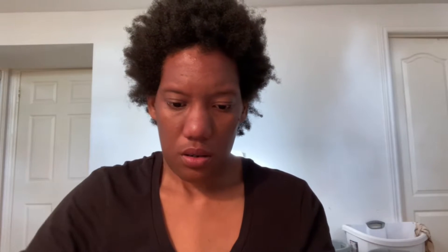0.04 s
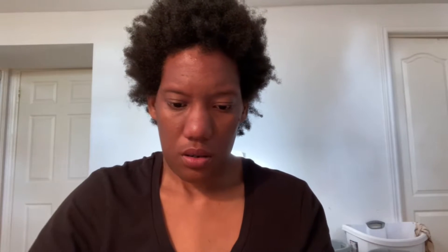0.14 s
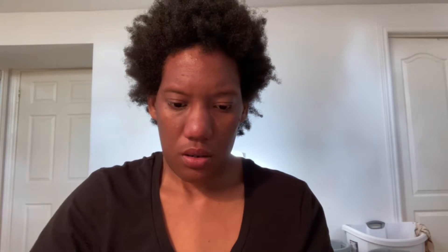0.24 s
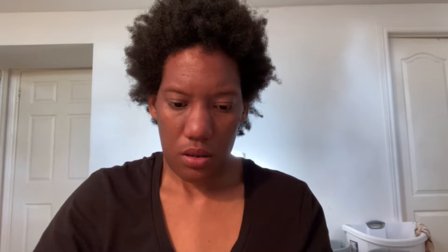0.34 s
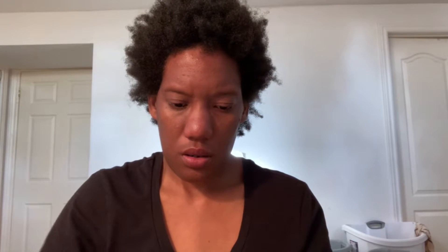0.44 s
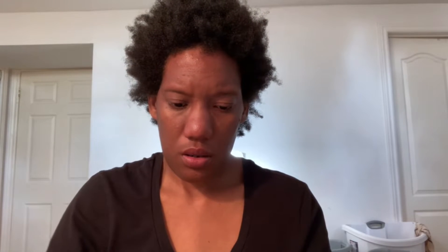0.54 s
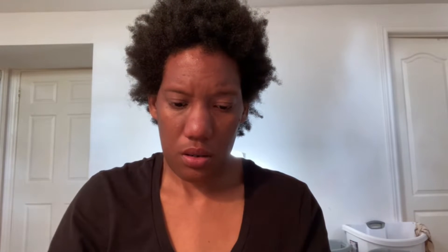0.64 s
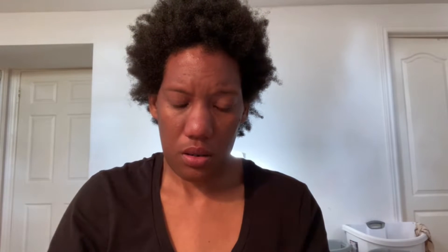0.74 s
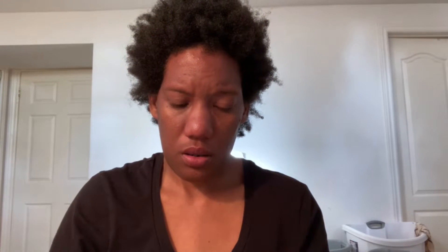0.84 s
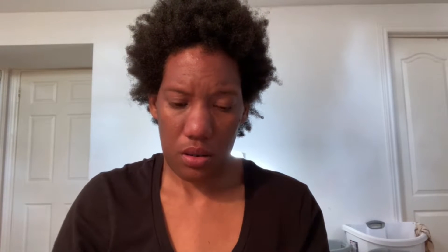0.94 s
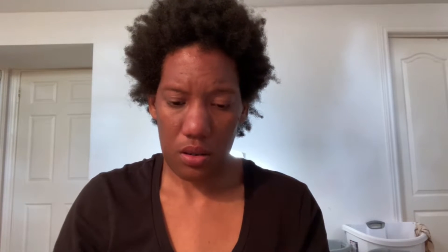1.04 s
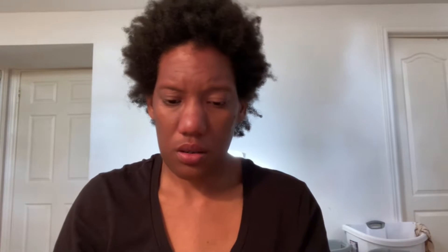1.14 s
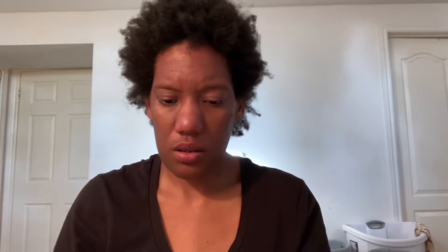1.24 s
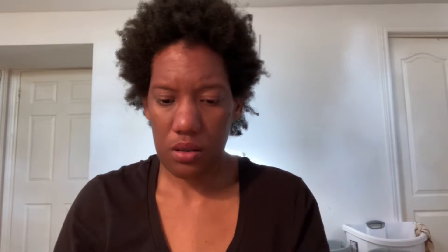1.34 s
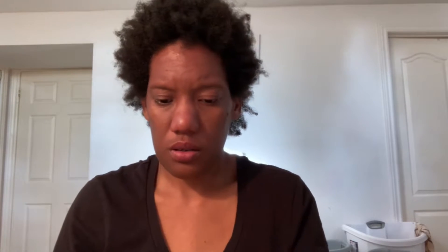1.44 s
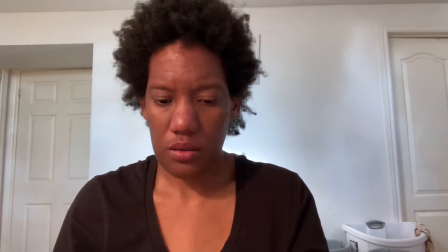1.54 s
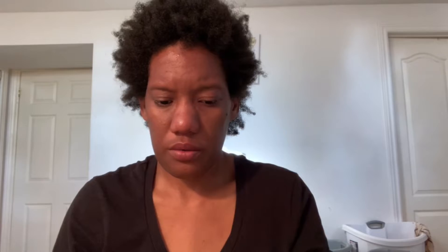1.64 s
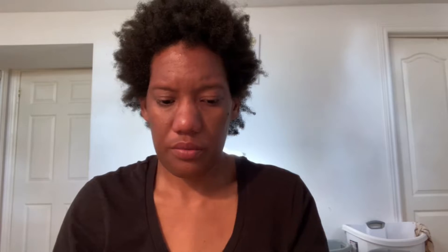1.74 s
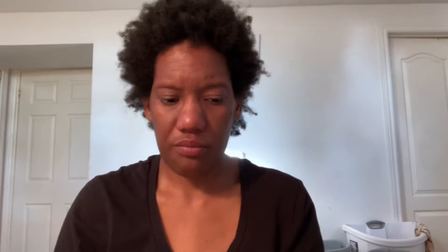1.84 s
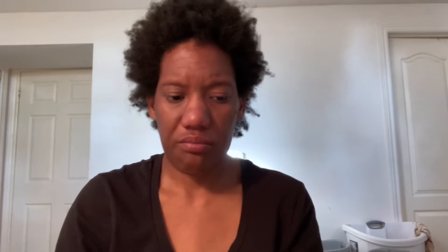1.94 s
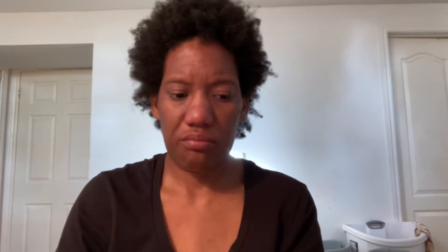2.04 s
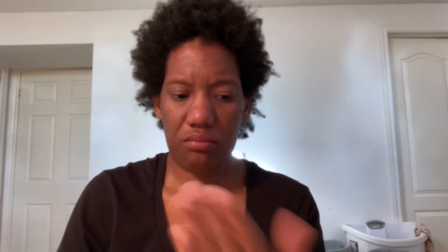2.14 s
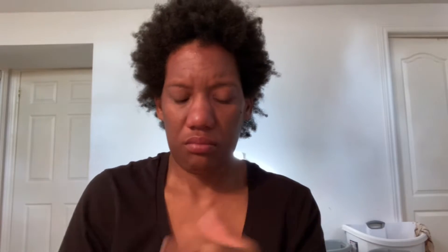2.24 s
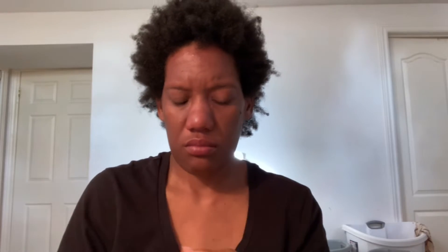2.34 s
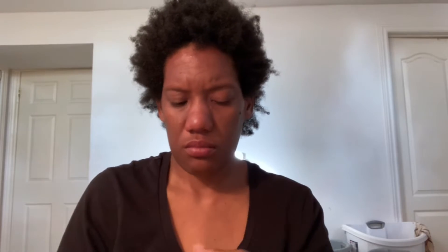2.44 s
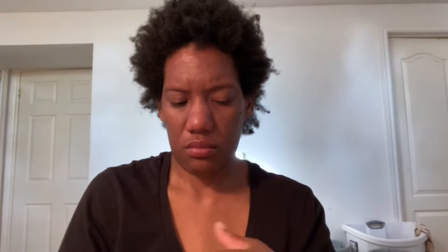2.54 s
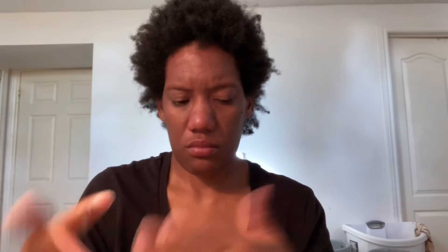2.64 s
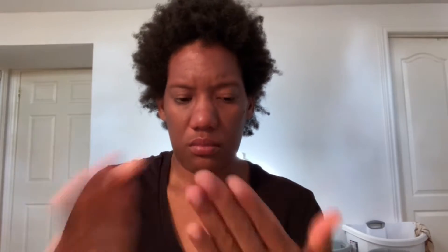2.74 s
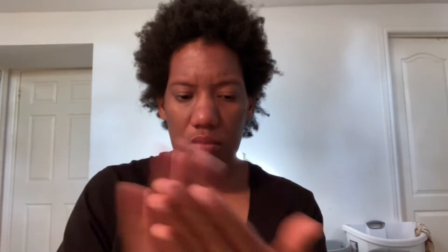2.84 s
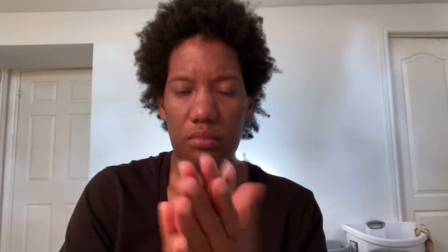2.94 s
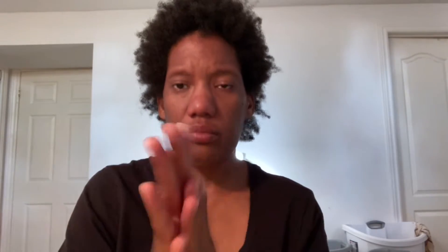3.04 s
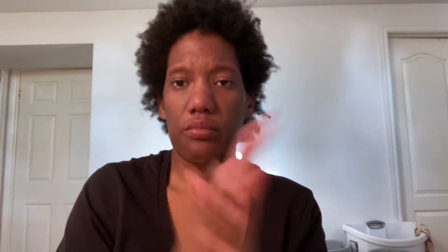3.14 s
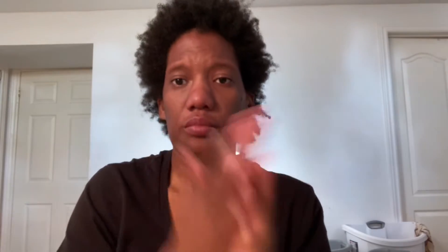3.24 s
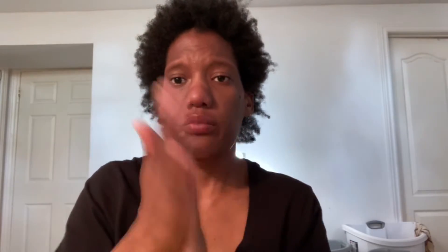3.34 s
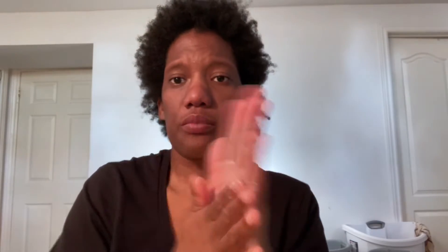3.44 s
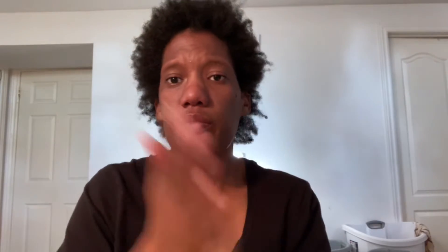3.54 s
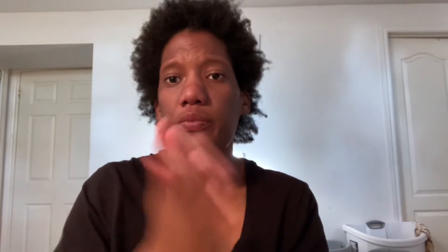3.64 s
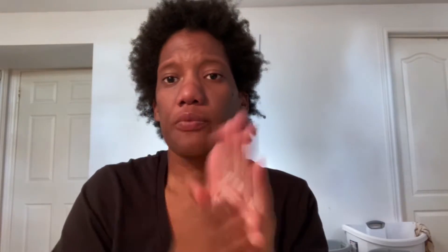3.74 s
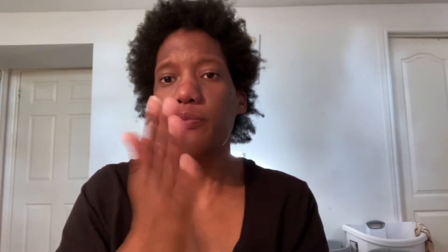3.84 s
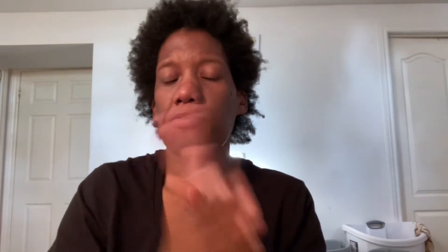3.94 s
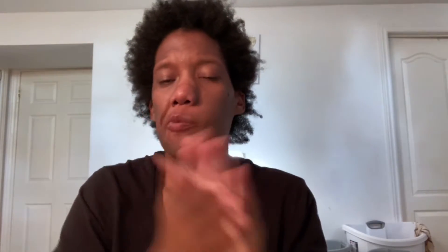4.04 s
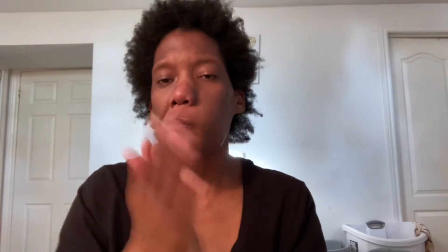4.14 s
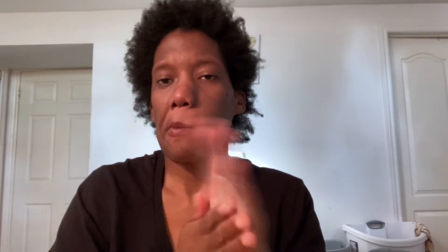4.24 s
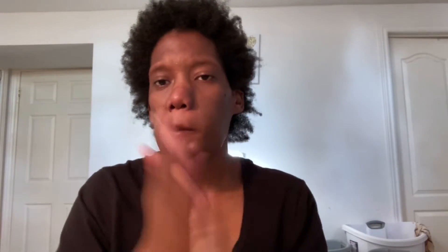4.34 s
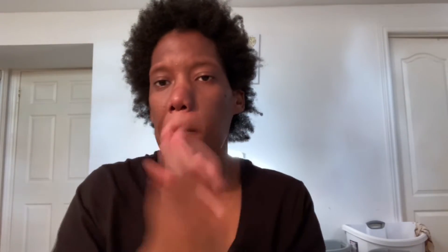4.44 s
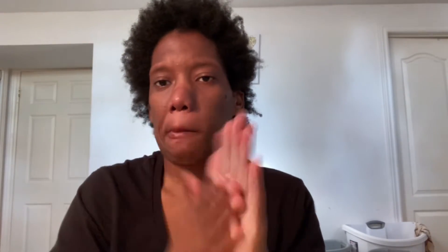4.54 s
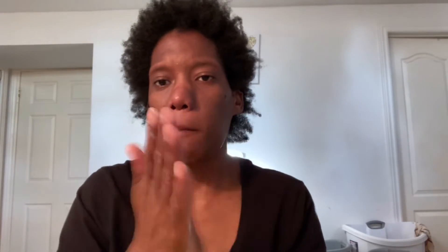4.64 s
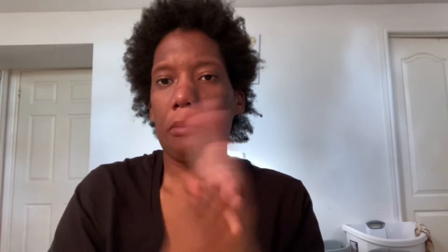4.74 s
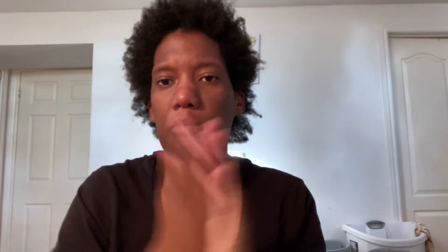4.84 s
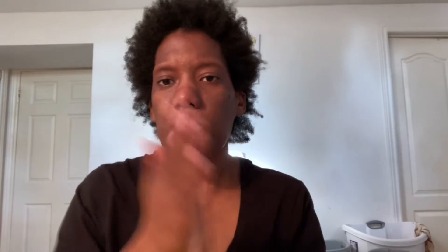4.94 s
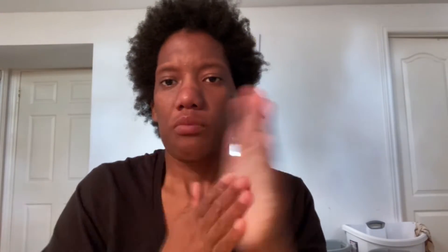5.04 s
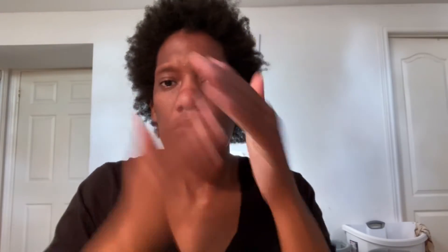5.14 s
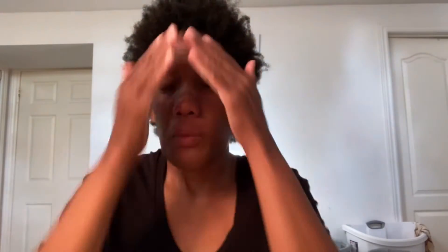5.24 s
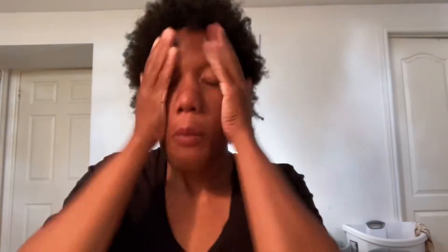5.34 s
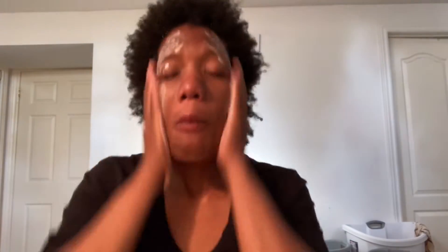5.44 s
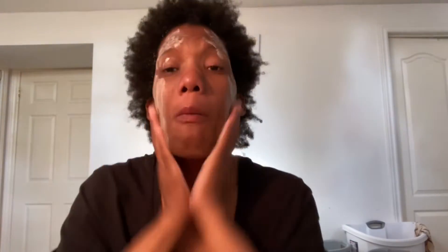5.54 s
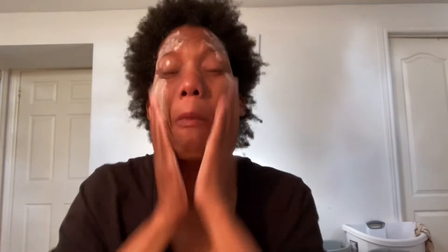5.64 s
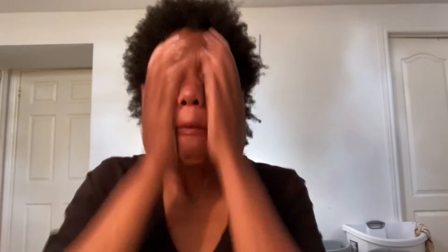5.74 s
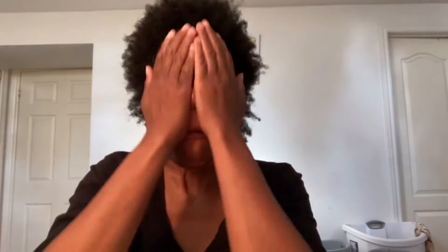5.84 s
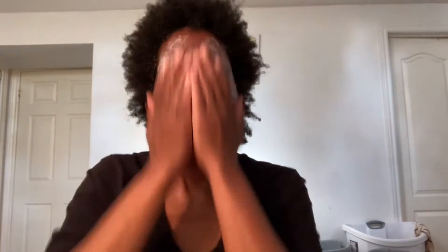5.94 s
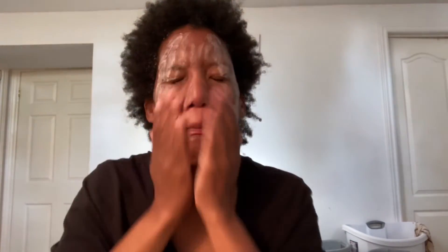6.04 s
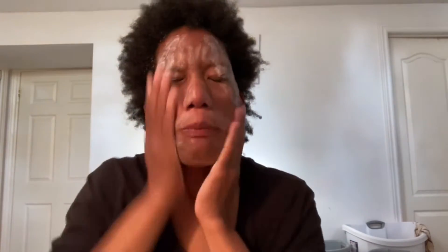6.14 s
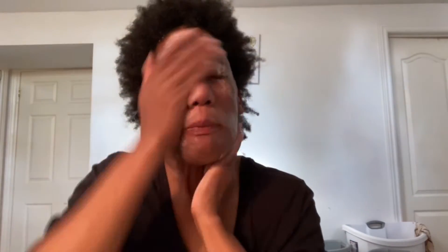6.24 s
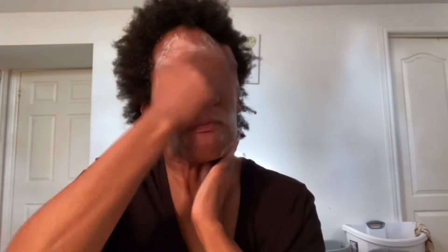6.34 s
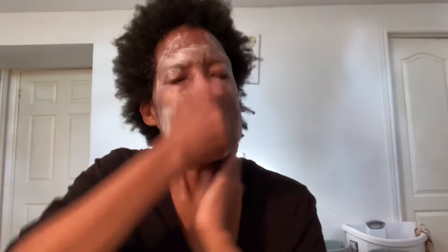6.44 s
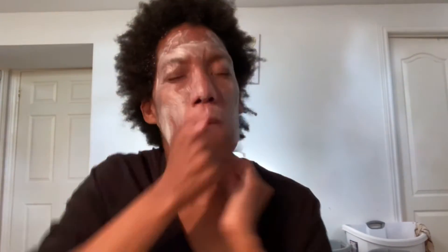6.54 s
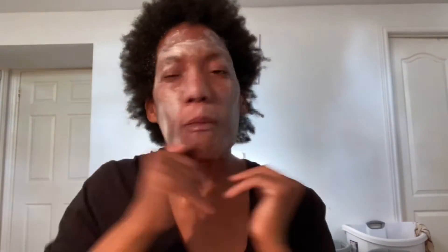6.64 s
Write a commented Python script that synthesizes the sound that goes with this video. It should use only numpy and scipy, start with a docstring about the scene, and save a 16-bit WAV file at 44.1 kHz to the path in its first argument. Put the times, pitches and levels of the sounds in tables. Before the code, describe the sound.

A small lid chinks and a pot thuds twice on a desk, then palms rub cream in quick wet strokes and slide softly over a face.

```python
"""A desk in a quiet room: a pot's lid chinks, the pot is set down on the desk that carries the microphone.
Two palms rub cream in quick strokes, then slide more slowly over a face: patchy noise under speed curves.
Sticking skin smacks: short damped tones and noise; a squelch and puffs are narrow-band noise.
Lid and pot are damped modes; the desk's thud is dispersed, high pitch first. Shaped noise hums behind."""
import sys
import numpy as np
from scipy import signal
from scipy.fft import rfft, irfft, next_fast_len
from scipy.io import wavfile
from scipy.ndimage import uniform_filter1d, map_coordinates

SR = 44100
rng = np.random.default_rng(int(sys.argv[2]) if len(sys.argv) > 2 else 0)


def wav_out(sig):
    """Save sig, one row per channel (or a flat mono array), as 16-bit PCM at SR to the path in sys.argv[1]."""
    wavfile.write(sys.argv[1], SR, np.round(np.clip(np.atleast_2d(sig).T, -1, 1) * 32767).astype(np.int16))


N = 295456

# quick palm strokes, push and pull in turn: centre t/s, time scale/s, level/dB, air pocket f/Hz
STROKES = [(3.191, .086, -43, 2420), (3.332, 0.076, -44.5, 3230), (3.456, 0.085, -44, 2500),
           (3.584, 0.075, -43.5, 2450), (3.717, 0.072, -42.5, 3500), (3.851, 0.086, -42, 2460),
           (3.984, 0.07, -42.5, 3520), (4.116, 0.089, -42, 2450), (4.25, 0.077, -44, 3280),
           (4.386, 0.1, -44.5, 2930), (4.516, 0.075, -42.5, 3400), (4.654, 0.078, -45.5, 2530),
           (4.778, 0.068, -40.5, 3400), (4.912, 0.076, -44.5, 2450), (5.049, 0.091, -39.5, 3600)]
# a brief tick and a touch of the skin, then slides, palm on palm and on the face:
# peak t/s, rise/s, fall/s, level/dB, fizz/dB, drag/dB, air pocket f/Hz, glide/(Hz/s)
SLIDES = [(2.551, .005, 0.0061, -58, 3, -15, 3350, -900), (2.913, .004, 0.048, -61, -11, -2, 3160, -900),
          (3.045, 0.048, 0.044, -53.5, -14, -9, 3400, 900),
          (5.375, 0.011, .015, -57.5, -10, 1.5, 2690, -900), (5.55, 0.12, .08, -61.5, -3, -1, 2750, -1500),
          (5.805, .065, .04, -56.5, -4.5, -7.5, 3610, -3000), (5.858, .02, 0.013, -64, -2, 4, 1750, -9000),
          (6.045, 0.072, 0.081, -56.5, -5.5, -3.5, 3360, -2500),
          (6.29, 0.074, .07, -63.5, 0, -6, 3050, -6000), (6.53, 0.13, 0.082, -65, -5.5, 1, 2350, 3000),
          (6.65, 0.053, 0.053, -68, 0, .5, 2800, -3000)]


def amp(db):
    """Gain of a level in dB."""
    return 10 ** (np.asarray(db) / 20)


def unit(x):
    """x at rms 1."""
    return x / np.sqrt(np.mean(x ** 2) + 1e-20)


def along(points, hz):
    """(Hz, value) points interpolated on a log frequency axis."""
    f, v = np.transpose(points)
    return np.interp(np.log(hz + 1), np.log(f + 1), v)


def wobble(rate_hz):
    """Smooth random curve, rate_hz knots a second."""
    knots = rng.standard_normal(int(N * rate_hz / SR) + 4)
    return map_coordinates(knots, [np.arange(N) * rate_hz / SR])


def filtered(x, response):
    """x times a complex response of frequency."""
    m = next_fast_len(len(x) + 4096)
    return irfft(rfft(x, m) * response(np.fft.rfftfreq(m, 1 / SR)), m)[:len(x)]


def patchy(depth_db):
    """Noise with patches of random gain over time and frequency."""
    z = signal.stft(rng.standard_normal(N), nperseg=256)[2]
    field = rng.standard_normal(z.shape)
    for axis in (0, 1):
        field = uniform_filter1d(field, size=4, axis=axis)
    return signal.istft(z * amp(depth_db * unit(field)), nperseg=256)[1][:N]


def add(track, s, sound):
    """Mix a sound in at s seconds."""
    part = track[round(s * SR):][:len(sound)]
    part += sound[:len(part)]


def ring(modes, t, spread_db):
    """Damped modes, at new random strengths for each blow."""
    out = np.zeros(len(t))
    for hz, db, t60_s in modes:
        decay = amp(db + spread_db * rng.standard_normal() - 60 * t / t60_s)
        out += decay * np.sin(2 * np.pi * hz * t)
    return out


def strokes():
    """Hand speed sets the level; direction and the air pocket between the palms colour each stroke."""
    # push, then pull: lean (-1..1), centre f/Hz, fizz/dB, pocket/dB, drag/dB
    push_pull = [(-.13, 5170, -10, 3.5, -8), (.03, 5140, -8.5, 4, -11.5)]
    half_window_s = .15
    t = np.arange(-half_window_s, half_window_s, 1 / SR)
    out, skin = np.zeros(N), slips()
    for k, (s, scale_s, db, pocket_hz) in enumerate(STROKES):
        lean, centre_hz, fizz_db, pocket_db, drag_db = push_pull[k % 2]
        u = t / scale_s
        u = u / (1 - np.clip(lean, -.8, .8) * np.sign(u))  # lean below 0: fast start, slow end
        speed = np.exp(-6.5 * np.abs(u) ** 2.34) + 0.15 * np.exp(-1.1 * u ** 2)

        def grip(f):
            pocket = 1 + 0.57 * amp(pocket_db) / (1 + ((f - pocket_hz) / 220) ** 2)
            return pocket * (2.3 + np.exp(-((f - centre_hz) / 2200) ** 2))

        start_s = s + t[0]
        drag, body, fizz = bands(filtered(skin[round(start_s * SR):][:len(t)], grip))
        rub = body + amp(fizz_db) * fizz + amp(drag_db - 3) * drag
        add(out, start_s, amp(db - 3) * speed * rub)
    return out


def slides():
    """A tick, a touch, then slides: skin grains, with an air pocket gliding in pitch under the hand."""
    t, out = np.arange(N) / SR, np.zeros(N)
    drag, body, fizz = bands(slips())
    sway = wobble(1100)
    # soft flesh moves with the hand
    flesh = unit(filtered(rng.standard_normal(N), lambda f: 1 / (1 + ((f - 230) / 190) ** 4)))
    for s, rise_s, fall_s, db, fizz_db, drag_db, hz, glide in SLIDES:
        u = (t - s) / np.where(t < s, rise_s, fall_s)
        speed = np.exp(-.9 * np.abs(u) ** 1.48)
        pocket = amp(-4.5) * sway * np.cos(2 * np.pi * (hz + glide * (t - s) / 2) * (t - s))
        rub = body + pocket + amp(fizz_db) * fizz + amp(drag_db - 2.5) * drag + amp(-7) * flesh
        out += amp(db) * speed * rub
    return out


def slips():
    """Skin ridges slip in dense tiny grains, in clumps."""
    # skin noise spectrum: f/Hz, level/dB
    skin_spectrum = [(200, -24), (500, -10), (1200, -11), (2000, -8.5), (2600, -5.5), (3800, -3),
                     (5500, -3.5), (7800, -4), (9000, -8.5), (15000, -9.5), (16000, -16.5)]
    grains = patchy(depth_db=3.0) * amp(0.75 * wobble(500) + 1.5 * wobble(45))
    return filtered(grains, lambda f: amp(along(skin_spectrum, f)))


def bands(x):
    """x split into drag (low), body and fizz (high), each at rms 1."""
    low = lambda f: 1 / (1 + (f / 2200) ** 8)
    high = lambda f: 1 / (1 + (8200 / (f + 1)) ** 12)
    middle = lambda f: (1 - low(f)) * (1 - high(f))
    return [unit(filtered(x, part)) for part in (low, middle, high)]


def smacks():
    """Each snap rings an air pocket briefly, with a low pop and a treble spit; cupped palms puff air."""
    # sticky skin snapping apart: t/s, snap/dB, snap f/Hz, pop/dB, pop f/Hz, spit/dB
    smack_rows = [(2.111, -60, 7610, -77, 1390, -58), (2.9185, -54, 5820, -65, 480, -57),
                  (3.0509, -37.5, 3570, -56, 1510, -51), (3.4476, -53, 3430, -38, 780, -63),
                  (3.473, -44, 7300, -41.5, 1010, -56), (3.4798, -38.5, 2530, -40.5, 1510, -58),
                  (3.5644, -37, 4760, -64, 450, -43), (3.619, -37, 6100, -68, 1570, -42),
                  (3.698, -35, 3380, -32.5, 756, -56), (3.7085, -34, 4200, -56, 500, -59),
                  (3.728, -38, 5860, -48, 1560, -65), (3.9695, -30, 2330, -38.5, 730, -45),
                  (3.9773, -51, 1920, -42, 1240, -44), (3.996, -30, 2300, -38, 1620, -62),
                  (4.2321, -36.5, 2520, -40, 710, -53), (4.246, -28, 3350, -41, 930, -43),
                  (4.2497, -31, 4170, -42.5, 730, -50), (4.268, -41, 3160, -47.5, 1430, -64),
                  (4.4943, -32.5, 2460, -49, 1140, -36.5), (4.5148, -34, 4630, -60, 980, -52),
                  (4.5188, -34, 3500, -37, 950, -50), (4.7587, -54, 3370, -43, 880, -63),
                  (4.7744, -32.5, 3220, -33.5, 810, -54), (4.7819, -39, 4000, -39.5, 654, -61),
                  (5.0172, -56, 4370, -44, 1020, -66), (5.0313, -21.5, 4220, -35.5, 1040, -40),
                  (5.3595, -43.5, 4410, -43.5, 1300, -49), (5.3686, -41, 3100, -43, 785, -62),
                  (5.4545, -50, 2570, -67, 520, -76), (5.5379, -51, 7570, -73, 530, -54),
                  (5.6083, -52, 6500, -72, 480, -49), (5.6217, -54, 7280, -61, 700, -49),
                  (5.7586, -50, 2770, -56, 410, -73), (6.005, -45, 4630, -68, 1260, -71),
                  (6.5394, -48, 2390, -66, 500, -58)]
    # cupped palms push air: start t/s, level/dB, f/Hz
    puff_rows = [(3.47, -52.5, 396), (3.562, -47.5, 137), (3.698, -54, 342), (3.963, -53, 130),
                 (4.238, -59, 207), (4.499, -57, 201), (4.769, -54.5, 200), (5.034, -45.5, 150),
                 (5.156, -54, 217), (5.359, -50.5, 127)]
    window_s, snap_t60_s, pop_t60_s = .04, 0.0063, .014
    out, t = np.zeros(N), np.arange(0, window_s, 1 / SR)

    def around(hz, wide_hz):
        noise = rng.standard_normal(len(t))
        return unit(filtered(noise, lambda f: 1 / (1 + ((f - hz) / wide_hz) ** 4)))

    def envelope(t60_s):
        shape = (1 - np.exp(-(t / 0.00058) ** 2)) * amp(-60 * t / t60_s)
        return shape / shape.max()

    snap_env, pop_env = envelope(snap_t60_s), envelope(pop_t60_s)
    for s, db, hz, pop_db, pop_hz, spit_db in [*smack_rows, *crackle()]:
        snap = amp(db) * (0.7 * np.sin(2 * np.pi * hz * t) + 0.72 * around(hz, wide_hz=1550))
        pop_tone = 1.08 * np.sin(2 * np.pi * pop_hz * t)
        pop = amp(pop_db) * (pop_tone + 0.62 * around(pop_hz, wide_hz=500))
        spit = amp(spit_db) * 1.1 * around(11200, wide_hz=3900)
        add(out, s, snap_env * (snap + spit) + pop_env * pop)
    for s, db, hz in puff_rows:
        add(out, s, amp(db - 3) * np.sin(np.pi * t / window_s) ** 2 * around(hz, wide_hz=123))
    return out


def crackle():
    """Small chance snaps, as further smack rows: one within each stroke, two as each SLIDES row dies away."""
    level_db, spread_db, typical_hz = 2, 3, 5100  # level over the rub they ride on
    stroke_db = -11  # the quick strokes mask theirs
    spans = [(s - scale_s / 2, scale_s, db + stroke_db) for s, scale_s, db, _ in STROKES]
    spans += 2 * [(s, fall_s, db) for s, _, fall_s, db, *_ in SLIDES]
    rows = []
    for start_s, width_s, db in spans:
        a, b, c, d, e = rng.standard_normal(5)
        s = start_s + width_s * (1 + np.tanh(a)) / 2
        snap_db = db + level_db + spread_db * b
        snap_hz = typical_hz * np.exp(0.36 * np.tanh(c))
        pop_hz = 850 * np.exp(.45 * d)
        spit_db = db + level_db - 5.5 + spread_db * e
        rows.append((s, snap_db, snap_hz, db - 7, pop_hz, spit_db))
    return rows


def squelch():
    """Narrow-band noise that rises in pitch as the air pocket shrinks."""
    # air pocket closing as the palms meet: t/s, f/Hz, level/dB
    pocket_path = [(2.97, 900, -70), (3.011, 1050, -54.5), (3.031, 1243, -55), (3.054, 1530, -58),
                   (3.08, 1610, -80)]
    s, hz, db = np.transpose(pocket_path)
    t = np.arange(N) / SR
    sway = wobble(600) + 1j * wobble(600)
    carrier = np.exp(2j * np.pi * np.cumsum(np.interp(t, s, hz)) / SR)
    return amp(np.interp(t, s, db, -120, -120)) * np.real(sway * carrier)


def desk():
    """Bending waves in the desk top travel faster at high pitch: a tick first, then a thud gliding down."""
    # blows on the desk: t/s, tick/dB, thud/dB, hardness/(dB/octave), travel at 100 Hz/s, scrape/dB
    blow_rows = [(1.5125, -37, -20, -5, 0.019, -59.5), (1.541, -50, -50, 4, .015, -90),
                 (1.612, -34.5, -14, -2.5, 0.01394, -63), (1.638, -44.5, -36, -4, 0.015, -90),
                 (2.251, -80, -49.5, 7.5, 0.0131, -86), (5.59, -67, -46.5, -12, .013, -90)]
    # desk top modes: f/Hz, level/dB, t60/s
    desk_modes = [(101.7, 3, 0.18), (133.3, 3, 0.098), (168.4, -6.5, 0.16), (202, -1, 0.083),
                  (245, -11.5, 0.24), (320, -25, 0.14)]
    # pot modes: f/Hz, level/dB, t60/s
    pot_modes = [(800, 0.5, 0.029), (1100, 1, 0.032), (1430, 2.5, 0.025), (2000, -3.5, 0.021),
                 (2540, -4, .012), (7600, -6, 0.016)]
    out, t = np.zeros(N), np.arange(SR // 2) / SR
    for s, tick_db, thud_db, hard_db, travel_s, scrape_db in blow_rows:
        crack = amp(-60 * t / 0.017) * rng.standard_normal(len(t))
        tick = ring(pot_modes, t, spread_db=1.0) + 0.96 * crack
        tick *= amp(tick_db - 10) * (1 - np.exp(-t / 0.00056))

        scrape = amp(scrape_db) * np.exp(-((t - .055) / 0.077) ** 2) * rng.standard_normal(len(t))
        scrape = filtered(scrape, lambda f: 1 / (1 + (f / 9000) ** 4))

        rattle = 1.8 * amp(-60 * t / 0.37) * rng.standard_normal(len(t))  # loose things rattle along
        thud = amp(thud_db - 10.5) * (ring(desk_modes, t, spread_db=1.2) + rattle)

        def thud_response(f):
            delay = np.exp(-4j * np.pi * travel_s * np.sqrt(100 * f))
            hardness = amp(hard_db * np.log2(f / 130 + 0.0092))
            # the microphone's low cut thins the thud's deep bass
            band = 1 / (1 + (f / 330) ** 6) / (1 + (85 / (f + 1)) ** 5)
            return delay * hardness * band

        add(out, s, tick + scrape + filtered(thud, thud_response))
    return out


def lid():
    """The pot's lid chinks: a short crack and a thin ring."""
    # chinks: t/s, level/dB
    chink_rows = [(0.8734, -55.5), (1.3674, -44), (1.3724, -43)]
    # lid modes: f/Hz, level/dB, t60/s
    lid_modes = [(3050, -8, .02), (6850, 1.5, 0.018), (7280, -3, 0.1)]
    out, t = np.zeros(N), np.arange(SR // 5) / SR
    for s, db in chink_rows:
        crack = 1.3 * amp(-60 * t / 0.0093) * rng.standard_normal(len(t))
        add(out, s, amp(db - 11.5) * (ring(lid_modes, t, spread_db=7.5) + crack))
    return out


def room(x):
    """Walls' answer as decaying noise: each frequency dies at its own speed."""
    # reverberation: f/Hz, t60/s
    decay_times = [(200, 0.36), (2000, 0.54), (10000, 0.33)]
    hz, t, z = signal.stft(rng.standard_normal(SR // 2), SR, nperseg=256)
    tail = signal.istft(z * amp(-60 * t / along(decay_times, hz)[:, None]), SR, nperseg=256)[1]
    delayed = np.pad(x, (250, 0))  # samples
    return signal.fftconvolve(delayed, tail / np.linalg.norm(tail))[:N]


def hum():
    """The room's steady air and the microphone's hiss: one shaped noise, split at 1200 Hz."""
    # background spectrum before the split: f/Hz, level/dB
    air_spectrum = [(15, -45), (25, -25), (63, -8), (145, -1.5), (201, -7.5), (243, -5.5), (337, -11.5),
                    (375, -11), (519, -12.5), (869, -17), (1270, -20), (1620, -23), (2710, -27.5),
                    (14900, -35.5), (16200, -53)]
    rumble_rms_db, hiss_rms_db = -63.5, -71
    air = filtered(patchy(depth_db=1.45), lambda f: amp(along(air_spectrum, f)))
    rumble = unit(filtered(air, lambda f: 1 / (1 + (f / 1200) ** 2)))
    hiss = unit(filtered(air, lambda f: 1 / (1 + (1200 / (f + 1)) ** 2)))
    return amp(rumble_rms_db) * rumble + amp(hiss_rms_db) * hiss


def scene():
    """Hands and lid sound through the air, the desk straight into the microphone."""
    near = strokes() + slides() + smacks() + squelch() + lid()
    air = filtered(near, lambda f: 1 / (1 + (70 / (f + 1)) ** 6))
    return (air + amp(-13.5) * room(air) + desk() + hum())[None]


def record(dry):
    """The microphone drops the deepest bass; nothing is kept above the band limit."""
    low_cut_hz, top_hz = 38, 15850
    return filtered(dry[0], lambda f: (f < top_hz) / (1 + (low_cut_hz / (f + 1)) ** 8))[None]


dry = scene()
out = record(dry)
wav_out(out)
```